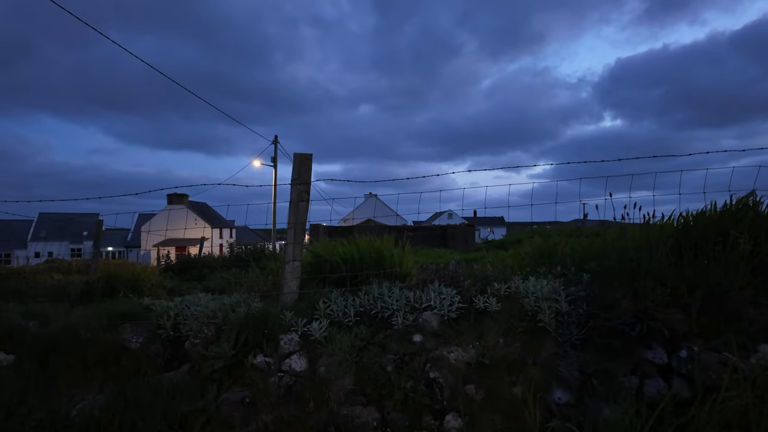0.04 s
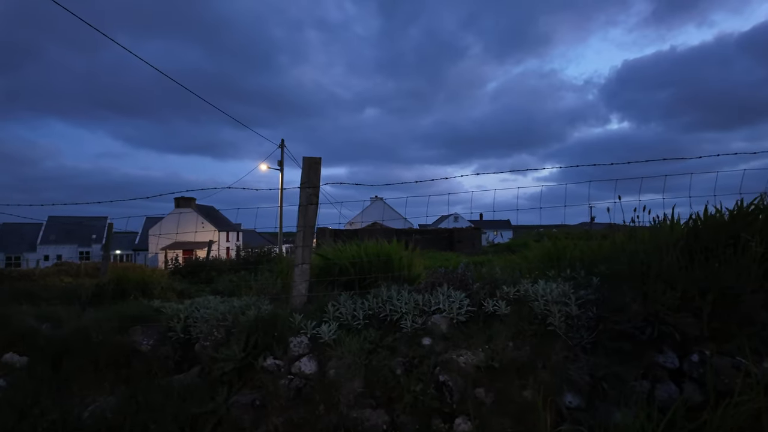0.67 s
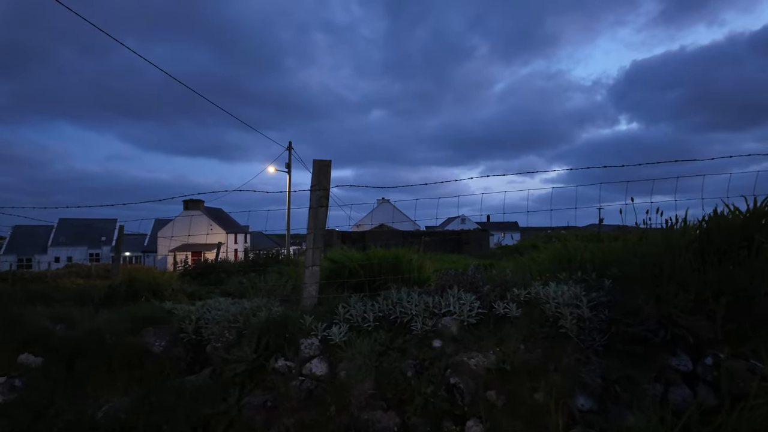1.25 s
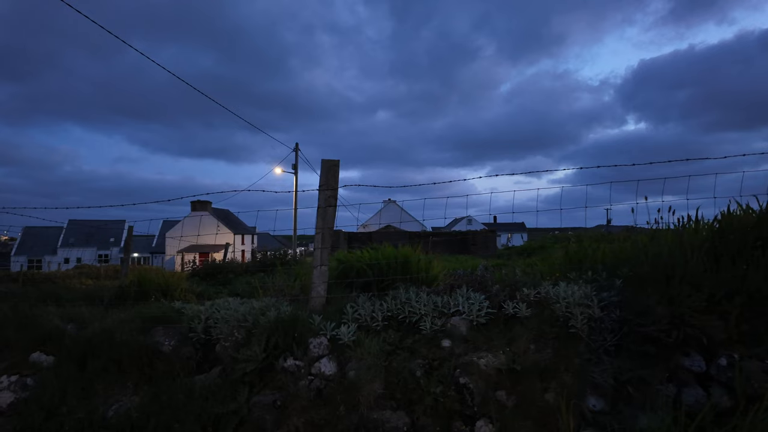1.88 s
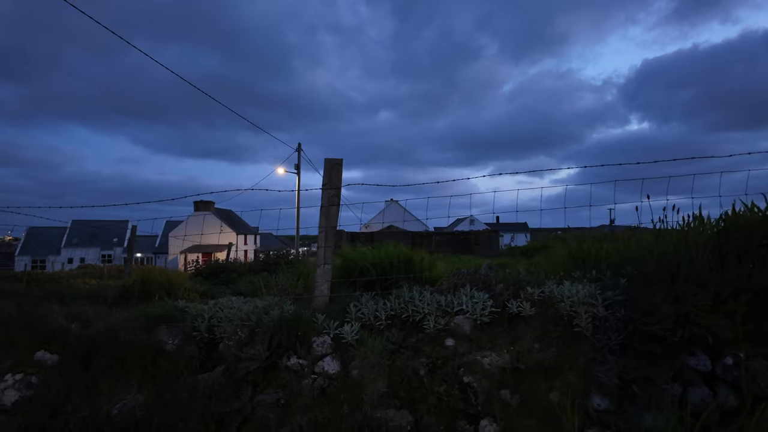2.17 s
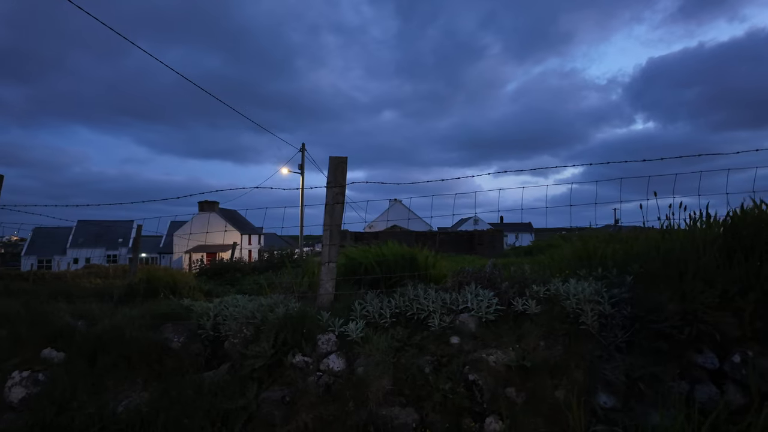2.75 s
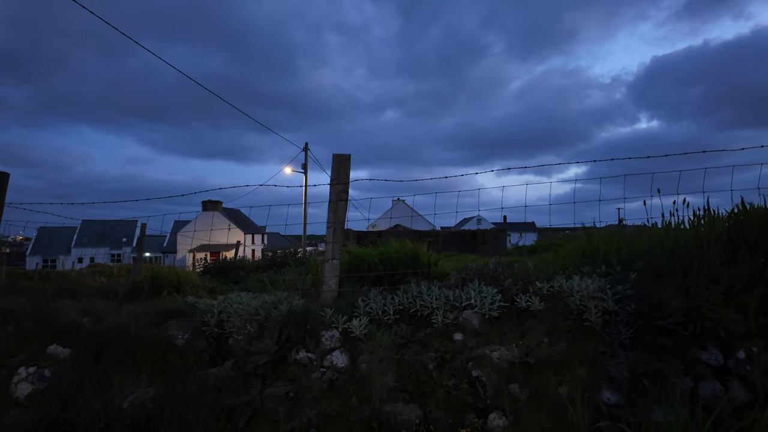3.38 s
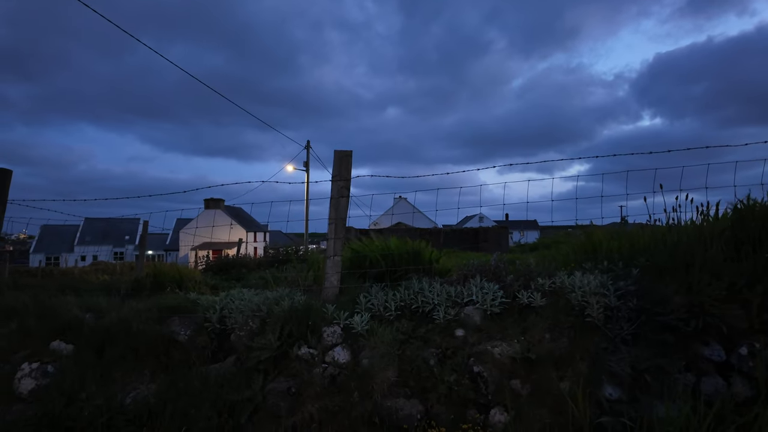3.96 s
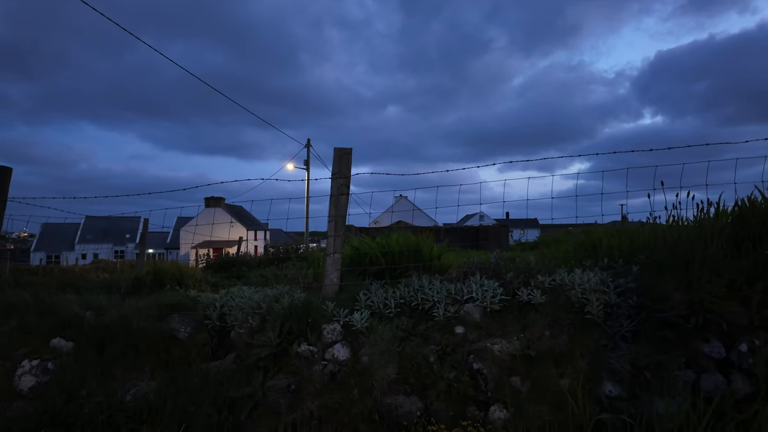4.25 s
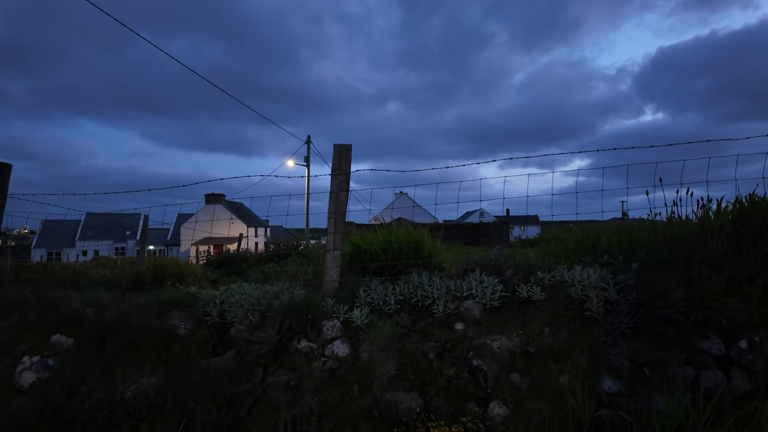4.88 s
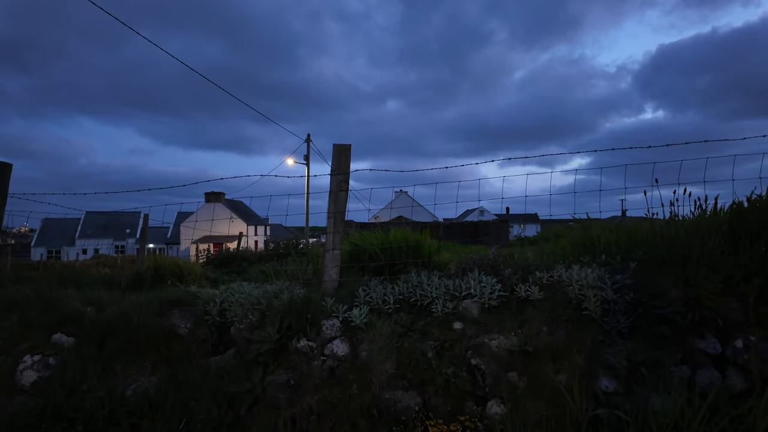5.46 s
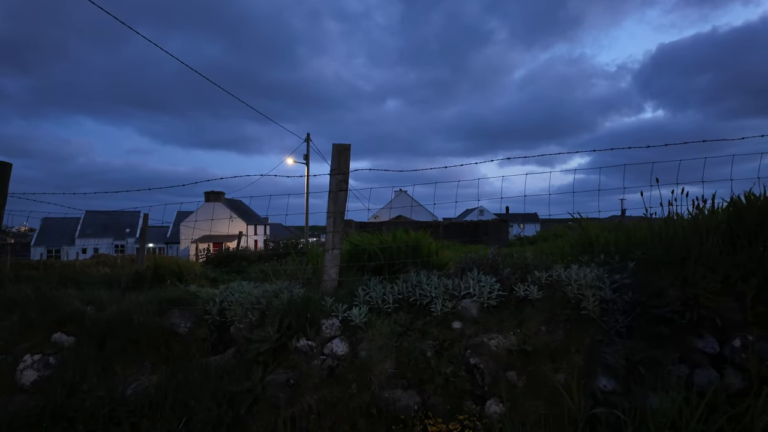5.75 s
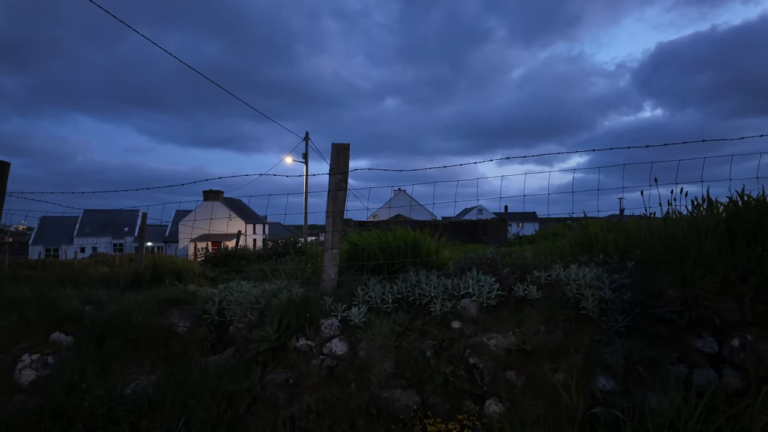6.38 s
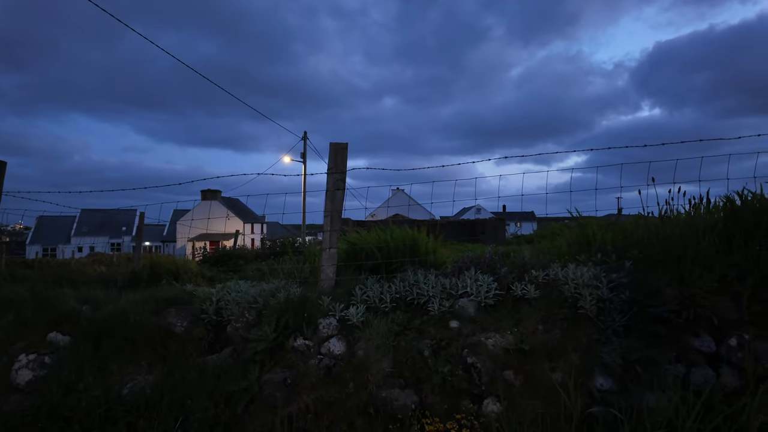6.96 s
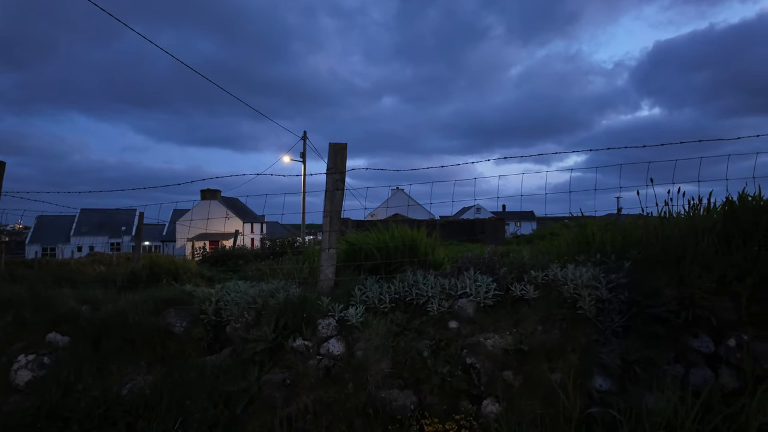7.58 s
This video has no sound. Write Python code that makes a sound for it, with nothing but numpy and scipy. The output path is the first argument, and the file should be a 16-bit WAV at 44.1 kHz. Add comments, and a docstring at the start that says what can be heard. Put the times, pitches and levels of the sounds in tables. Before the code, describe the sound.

A nearby bird repeats a dry, ratcheting double rasp, with soft wind and faint distant chirps behind it.

```python
"""A corncrake rasps its paired calls from a meadow at dusk. Each rasp is an impulse train: a limping run
of hard clicks that excites the resonances of throat and bill. Grass scatters the clicks and walls
reflect them. Far away a rival rasps and small birds sing gliding tones, over a steady distant wash
and gusts of turbulent wind that rumble on the microphone."""
import sys
import numpy as np
from scipy import signal
from scipy.fft import rfft, irfft, next_fast_len
from scipy.io import wavfile
from scipy.ndimage import uniform_filter1d

SR = 44100
rng = np.random.default_rng(int(sys.argv[2]) if len(sys.argv) > 2 else 0)


def int16_out(signal):
    """Quantize to a 16-bit WAV file."""
    q = np.round(np.clip(np.atleast_2d(signal).T, -1, 1) * 32767)
    wavfile.write(sys.argv[1], SR, q.astype(np.int16))


N = 336042
TIME = np.arange(N) / SR


def from_db(db):
    return 10 ** (np.asarray(db) / 20)


def unit_rms(x):
    return x / np.sqrt(np.mean(x ** 2) + 1e-20)


def unit_energy(x):
    return x / np.sqrt(np.sum(x ** 2) + 1e-20)


def convolve(x, response):
    return signal.fftconvolve(x, response)[:len(x)]


def delayed(x, delay_s):
    return np.interp(TIME - delay_s, TIME, x, left=0)


def curves(rows):
    """Linear interpolation of each column against the first, time_s."""
    time_s, *columns = np.transpose(rows)
    return [np.interp(TIME, time_s, column) for column in columns]


def butterworth(x, hz, kind, order=2):
    """Maximally flat low- or high-pass filter."""
    return signal.sosfilt(signal.butter(order, min(hz, .45 * SR), kind, fs=SR, output="sos"), x + 1e-18)


def coloured_noise(spectrum):
    """Spectral shaping of white noise; rms 1."""
    hz, db = np.transpose(spectrum)
    size = next_fast_len(N)
    log_hz = np.log(np.fft.rfftfreq(size, 1 / SR) + 1)
    gain = from_db(np.interp(log_hz, np.log(hz), db, right=-120))
    return unit_rms(irfft(rfft(rng.standard_normal(size)) * gain, size)[:N])


def diffuse_tail(t60_s):
    """Diffuse reverberation: exponentially decaying noise; energy 1."""
    return unit_energy(rng.standard_normal(SR) * from_db(-60 * TIME[:SR] / t60_s))


# spectrum of the distant wash: frequency_hz, relative_db
WASH_SPECTRUM = [(18, -52), (30, -3), (95, -18), (187, -3.5), (202, -4.5), (292, -3), (505, -3),
                 (591, -4.5), (728, -5), (897, -9), (1290, -17), (1720, -28), (4420, -26), (4780, -27.5),
                 (15500, -47.5)]
# swell of its lower part: time_s, gain_db
WASH_SWELL = [(0, -0.5), (.45, 4), (1.0, 0), (2.8, -1.5), (5.3, -2), (7.62, -0.5)]
# hiss that lifts for a second: time_s, level_db
HISS_LEVELS = [(4.09, -110), (4.14, -77), (5.1, -76), (5.16, -110)]
# dry ticks in the grass: peak_s, level_db
GRASS_TICKS = [(2.0, -62), (6.631, -62)]


def background(wash_db=-55.5, low_cut_hz=55, swell_below_hz=1100, tick_s=0.0036):
    """Amplitude-modulated noise: a gently swelling wash, thin hiss and dry ticks."""
    swell_db, = curves(WASH_SWELL)
    hiss_db, = curves(HISS_LEVELS)
    wash = from_db(wash_db) * butterworth(coloured_noise(WASH_SPECTRUM), low_cut_hz, "high")
    swell = (from_db(swell_db) - 1) * butterworth(wash, swell_below_hz, "low", order=1)
    hiss = from_db(hiss_db) * rng.standard_normal(N)
    tick_envelope = sum(from_db(db) * np.exp(-np.abs(TIME - s) / tick_s) for s, db in GRASS_TICKS)
    ticks = tick_envelope * unit_rms(butterworth(rng.standard_normal(N), 4900, "low"))
    return wash + swell + hiss + ticks


# spectrum of the eddies: frequency_hz, relative_db
EDDY_SPECTRUM = [(15, -54), (25, -6), (107, -1.5), (236, -9), (274, -14.5), (352, -15), (379, -21),
                 (500, -23.5), (650, -25), (1100, -120)]
# strength of the wind: time_s, relative_db
GUST_STRENGTH = [(0.0, -61), (0.55, -65.5), (0.72, -62.5), (1.42, -62.5), (1.78, -52), (1.89, -58.5),
                 (2.19, -59), (2.78, -65.5), (3.01, -61.5), (3.18, -59), (4.05, -62), (4.75, -56.5),
                 (5.11, -64), (5.39, -65), (5.75, -54.5), (5.9, -48.5), (6.07, -45), (6.35, -43.5),
                 (6.88, -57.5), (7.32, -57.5), (7.49, -60), (7.62, -65)]
# buffets on the microphone: peak_s, level_db
WIND_BUFFETS = [(1.636, -47), (3.251, -53), (4.106, -46), (5.87, -45.5), (6.295, -41.5)]


def wind(gust_gain_db=3.5, calm_db=-62.0, strong_db=-48.0, lumpy_db=2.0, lumps_hz=13.6, buffet_s=0.017):
    """Turbulent pressure fluctuation: gusts above a calm level rumble, and faster air rumbles higher."""
    gust_db, = curves(GUST_STRENGTH)
    lumps = unit_rms(butterworth(rng.standard_normal(N), lumps_hz, "low"))
    flow = np.sqrt(np.maximum(from_db(gust_db + gust_gain_db) ** 2 - from_db(calm_db) ** 2, 0))
    buffets = sum(from_db(db) * np.exp(-((TIME - s) / buffet_s) ** 2) for s, db in WIND_BUFFETS)
    slow_eddies = coloured_noise(EDDY_SPECTRUM)
    fast_eddies = butterworth(coloured_noise(EDDY_SPECTRUM), 62, "high", order=1)
    fast_share = np.clip(from_db(gust_db - strong_db) ** 2, 0, 1)
    eddies = np.sqrt(1 - fast_share) * slow_eddies + np.sqrt(fast_share) * fast_eddies
    return (flow * from_db(lumpy_db * lumps) + buffets) * eddies


def whistle(rows, waver=0.0071, fade_s=0.0064):
    """Frequency modulation: a wavering sine glides through rows of time_s, pitch_hz, level_db."""
    hz, db = curves(rows)
    gate = np.clip(np.minimum(TIME - rows[0][0], rows[-1][0] - TIME) / fade_s, 0, 1)
    on = gate > 0
    wobble = unit_rms(uniform_filter1d(rng.standard_normal(on.sum()), size=100))
    phase = 2 * np.pi * np.cumsum(hz[on] * (1 + waver * wobble)) / SR
    tone = np.zeros(N)
    tone[on] = gate[on] * from_db(db[on]) * np.sin(phase)
    return tone


# a small bird's falling chirps: start_s, peak_db, start_hz
FALLING_CHIRPS = [(4.675, -67, 4900), (5.335, -74, 4900), (5.756, -70, 4840), (5.962, -66, 4880),
                  (6.35, -65, 4770), (6.537, -58.5, 4770), (6.742, -63, 4770), (7.15, -81, 4800)]
# far arched whistles: start_s, length_s, level_db, start_hz, end_hz, arch_hz
ARCHED_WHISTLES = [(5.018, .09, -68, 2600, 2840, 27), (6.232, 0.16, -66.5, 2710, 2520, 429),
                   (6.465, .06, -74, 6300, 6150, -250), (6.972, 0.085, -62.5, 3020, 2760, 200)]


def small_birds(chirp_s=0.054, fall_hz=260, fade_db=10.0, tail_db=-10.0):
    """Pure-tone glides: chirps fall and fade, whistles arch, and distance adds short reverberation."""
    contours = []
    for s, db, hz in FALLING_CHIRPS:
        knee = (s + chirp_s / 3, hz - fall_hz / 2, db)
        end = (s + chirp_s, hz - fall_hz, db - fade_db)
        contours.append([(s, hz, db), knee, end])
    along = np.linspace(0, 1, 9)
    for start_s, length_s, db, start_hz, end_hz, arch_hz in ARCHED_WHISTLES:
        pitch_hz = start_hz + along * (end_hz - start_hz) + arch_hz * np.sin(np.pi * along)
        contours.append([(s, hz, db) for s, hz in zip(start_s + along * length_s, pitch_hz)])
    song = sum(whistle(rows) for rows in contours)
    return song + from_db(tail_db) * convolve(song, diffuse_tail(t60_s=.3))


def resonator(resonances, size=4096):
    """Parallel steep-sided resonances as a minimum-phase impulse response; energy 1."""
    hz = np.fft.rfftfreq(size, 1 / SR)
    power = sum(from_db(db) ** 2 / (1 + np.abs((hz - centre) / (width / 2)) ** 5)
                for centre, width, db in resonances)
    cepstrum = irfft(np.log(power) / 2)
    # folding the cepstrum makes the response causal
    cepstrum[1:size // 2] *= 2
    cepstrum[size // 2 + 1:] = 0
    return unit_energy(irfft(np.exp(rfft(cepstrum))))


def ratchet(count, drag_ms, limp_ms=2.77, hurry_ms=1.65, jitter_ms=.1):
    """Pulse-interval modulation: times and strengths of clicks that hurry, limp, then drag and weaken."""
    click = np.arange(round(count))
    gap = click[:-1]
    pace_ms = 8.75 - .03 * (len(click) - 16)   # longer rasps run a little quicker
    # clicks bunch in threes; the bunches slowly tighten and die out late in the rasp
    limp = np.cos(2 * np.pi * ((gap - .5) / 3.06 + .0029 * gap ** 2)) * np.exp(-(gap / 17.6) ** 4)
    drag = np.exp((gap - gap[-1]) / 1.6)
    gaps_ms = pace_ms - limp_ms * limp - hurry_ms * (gap == 0) + drag_ms * drag
    jitter = rng.standard_normal(len(click)) * (click > 0)
    times_ms = np.append(0, np.cumsum(gaps_ms)) + jitter_ms * jitter
    level_db = -2.0 * (click == 0) - 3.0 * np.exp((click - click[-1]) / 2.6)
    return times_ms / 1000, from_db(level_db)


def impulses(times_s, strengths, size=SR // 4):
    """Impulse train: single-sample clicks within a quarter second."""
    return np.bincount(np.clip(np.round(times_s * SR).astype(int), 0, size - 1), strengths, size)


def puffs(times_s, strengths, width_s):
    """Turbulence noise: a short swell of air at each click."""
    age = TIME[:SR // 40] / width_s
    envelope = convolve(impulses(times_s, strengths), unit_energy(np.sqrt(age) * np.exp(-age)))
    return envelope * rng.standard_normal(len(envelope))


def rasp(count, drag_ms, throat, bill, tick_db=-2.5, rebound_db=-7.5, rough_db=-8.0, hiss_db=-25.0):
    """Source and filter: each click ticks open, slaps shut, rebounds and trails a puff of air."""
    opening_s, strengths = ratchet(count, drag_ms)
    spread = np.exp(.1 * rng.standard_normal((len(opening_s), 2)))
    closing_s = opening_s + 0.001156 * spread[:, 0]
    rebound_s = closing_s + 0.001177 * spread[:, 1]
    tick = from_db(tick_db) * butterworth(impulses(opening_s, strengths), 4200, "high", order=3)
    slap = impulses(closing_s, strengths) + from_db(rebound_db) * impulses(rebound_s, strengths)
    rough_air = from_db(rough_db) * puffs(opening_s, strengths, width_s=0.0026)
    thin_air = from_db(hiss_db) * puffs(opening_s, strengths, width_s=0.0022)
    return convolve(tick + slap + rough_air, throat) + convolve(thin_air, bill)


def grass_scatter(call, scatter_db=-9.0, rise_s=0.0046):
    """Multiple scattering: grass adds a tail that builds up and dies quickly."""
    arrival = np.clip(TIME[:len(call)] / rise_s, 0, 1)
    response = unit_energy(arrival * diffuse_tail(t60_s=0.071)[:len(call)])
    return call + from_db(scatter_db) * convolve(call, response)


# bands of the air hissing through the bill: centre_hz, width_hz, relative_db
BILL_BANDS = [(8700, 4140, 2.5), (9920, 580, 5.5), (11000, 450, -4), (12700, 600, -9), (14800, 1300, -18)]


def calling_bird(rasps, resonances, treble_hz=4500):
    """Directivity: the bird turns its head between rasps, so each has its own treble."""
    throat, bill = resonator(resonances), resonator(BILL_BANDS)
    track = np.zeros(N + SR)
    for start_s, count, drag_ms, gain_db, treble_db, *_ in rasps:
        call = rasp(count, drag_ms, throat, bill)
        call += (from_db(treble_db) - 1) * butterworth(call, treble_hz, "high", order=1)
        at = round(start_s * SR)
        track[at:at + len(call)] += from_db(gain_db) * grass_scatter(call)
    return track[:N]


# the rival's rasps: start_s, click_count, drag_ms, gain_db, treble_db
RIVAL_CALLS = [(6.745, 16, 2.7, 2, 0), (7.238, 20, 2, -2, -1)]
# its resonances that carry this far: centre_hz, width_hz, relative_db
RIVAL_RESONANCES = [(3013, 540, -6), (3830, 200, 1)]


def rival():
    """Temporal smearing: distance blurs the clicks of a second corncrake."""
    return convolve(calling_bird(RIVAL_CALLS, RIVAL_RESONANCES), diffuse_tail(t60_s=0.033))


# reflections from walls and houses: delay_s, gain_db, cutoff_hz
WALL_ECHOES = [(0.0253, -25.5, 12000), (0.058, -18.5, 13000), (0.166, -47, 6790), (.331, -58, 7000)]


def reflections(thrown, ground_s=0.000309, ground_share=0.28, tail_db=-25.0):
    """Reflection and reverberation: a few separate echoes and a faint dull tail."""
    # interference with a bounce off the ground hollows the echoes near 3 kHz
    grazing = thrown - ground_share * delayed(thrown, ground_s)
    echoes = sum(from_db(db) * butterworth(delayed(grazing, s), hz, "low") for s, db, hz in WALL_ECHOES)
    tail = butterworth(convolve(grazing, diffuse_tail(t60_s=0.61)), 6500, "low")
    return echoes + from_db(tail_db) * tail


# the near bird's rasps: start_s, click_count, drag_ms, gain_db, treble_db, echo_gain_db
CORNCRAKE_CALLS = [(0.1957, 16, 3.43, -0.7, 1.4, -0.5), (0.77, 19, 2.03, -0.44, -0.3, 0),
                   (1.6073, 16, 3.13, -1, -2, 3), (2.1352, 21, 4, -2, 2, 2),
                   (2.9791, 16, 3.3, -2.5, 2, 3.5), (3.5348, 19, 1.32, -1.1, 4.3, -1.5),
                   (4.2434, 17, 3, -1, -2.5, 0), (4.7833, 20, 1.42, -1.54, -3.5, 1),
                   (5.4657, 18, 2.6, -1, 2.2, -0.5), (5.9904, 21, 1.94, -0.4, 1, -2.5),
                   (6.796, 16, 2.34, 0.5, -0.3, -1.5), (7.3292, 21, 3.15, -1, 1, 0.5)]
# resonances of throat and open bill: centre_hz, width_hz, relative_db
THROAT_RESONANCES = [(874, 246, -17), (1070, 228, -12), (1590, 67, -31.5), (2236, 270, -11),
                     (2450, 190, -15), (2909, 383, -3), (3140, 370, -4.5), (3440, 290, 0),
                     (3772, 207, -7.5), (4376, 273, -5.5), (4503, 110, -6.5), (4875, 320, -11.5),
                     (5318, 217, -0.5), (5630, 290, -3.5), (5950, 160, -6.5), (6390, 215, -14.5),
                     (6610, 520, -20), (7430, 280, -27.5)]


def corncrake():
    """Superposition of direct and reflected sound; echoes grow as the bird turns towards the walls."""
    direct = calling_bird(CORNCRAKE_CALLS, THROAT_RESONANCES)
    start_s, *_, echo_gain_db = np.transpose(CORNCRAKE_CALLS)
    current_rasp = np.searchsorted(start_s, TIME) - 1
    return direct + reflections(direct * from_db(echo_gain_db[current_rasp]))


def scene(corncrake_db=-5.5, rival_db=-41.0):
    """Linear superposition of all the sources; mono."""
    rasps = from_db(corncrake_db) * corncrake() + from_db(rival_db) * rival()
    return (rasps + small_birds() + wind() + background())[None]


def record(dry, low_cut_hz=28, high_cut_hz=15750):
    """Band limiting: the deepest rumble is thinned and the top is cut steeply."""
    steep_low_pass = signal.ellip(10, .1, 80, high_cut_hz, fs=SR, output="sos")
    return signal.sosfilt(steep_low_pass, butterworth(dry, low_cut_hz, "high"))


dry = scene()
out = record(dry)
int16_out(out)
```